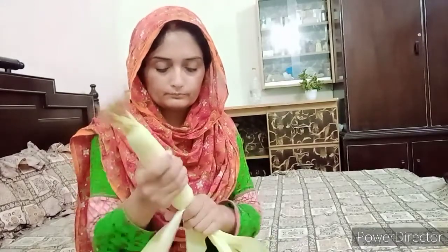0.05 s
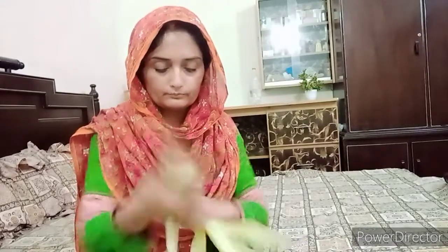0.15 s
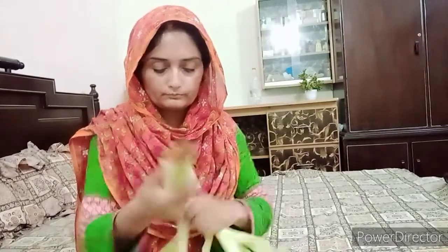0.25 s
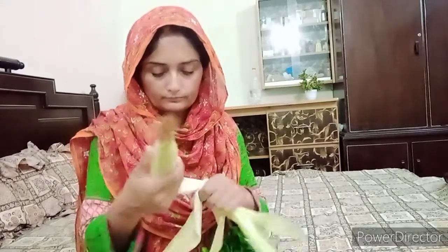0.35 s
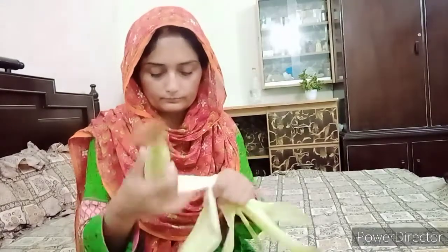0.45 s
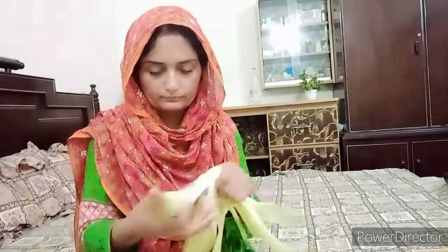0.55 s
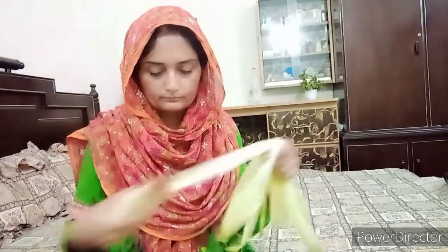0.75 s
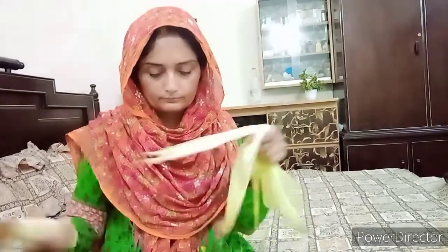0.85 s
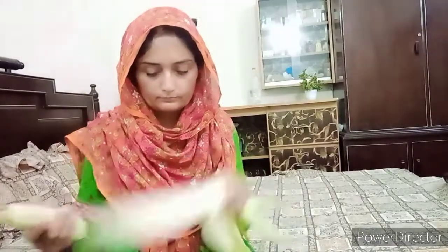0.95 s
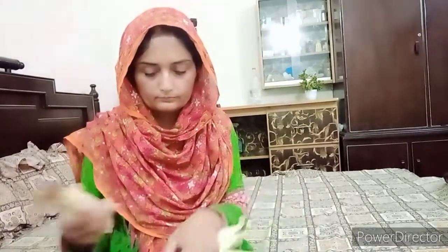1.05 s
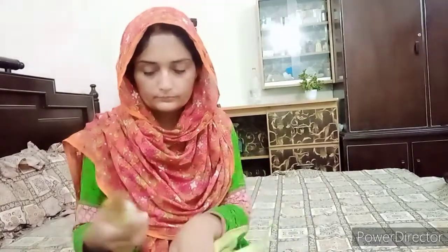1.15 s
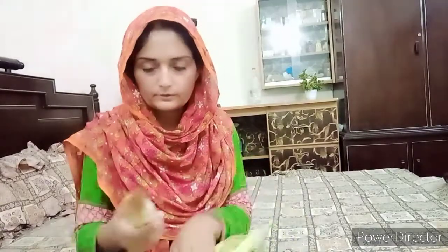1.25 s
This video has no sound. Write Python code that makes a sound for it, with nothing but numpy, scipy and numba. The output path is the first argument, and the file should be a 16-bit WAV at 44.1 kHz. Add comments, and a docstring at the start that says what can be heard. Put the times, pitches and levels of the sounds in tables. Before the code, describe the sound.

Dry corn husk crackles under fingers, snaps sharply off the cob, then tears in a short pull and a longer, louder one. Loose leaves brush softly afterwards, close to the microphone in a small, quiet room.

```python
"""Husking corn by hand

A small, quiet room, one microphone close to the hands. Fingers rustle and crease the dry husk.
A leaf snaps loose, knocking the cob, then tears along its fibres in a short and a long pull.
The loose husk brushes past and is gripped again. A low hum, perhaps a fan, wavers underneath."""
import sys
import numpy as np
from scipy import signal
from scipy.fft import rfft, irfft
from scipy.io import wavfile
from numba import njit

SR = 44100
rng = np.random.default_rng(int(sys.argv[2]) if len(sys.argv) > 2 else 0)


def unload_audio(sound):
    """Save the sound as a 16-bit wav file, at the path given as the first command line argument."""
    columns = np.transpose(np.atleast_2d(sound))
    # keep every value between -1 and 1, then stretch to whole-number steps
    steps = np.round(np.clip(columns, -1, 1) * 32767)
    wavfile.write(sys.argv[1], SR, steps.astype(np.int16))


N = 57330
TIME = np.arange(N) / SR


def undb(db):
    """Decibels to gain."""
    return 10 ** (np.asarray(db) / 20)


def unit(x):
    """Scale to rms 1."""
    return x / np.sqrt(np.mean(x ** 2))


def colour(x, points):
    """Causal filter of unit power, shaped through (frequency [Hz], relative gain [dB]) points."""
    hz, db = np.array(points, float).T
    size = 4096
    log_hz = np.log(np.fft.rfftfreq(size, 1 / SR) + 1)
    gain = unit(undb(np.interp(log_hz, np.log(hz), db)))
    cepstrum = irfft(np.log(gain))[:size // 2]
    cepstrum[1:] *= 2  # minimum phase
    response = irfft(np.exp(rfft(cepstrum, size)))[:size // 2]
    return signal.fftconvolve(x, response)[:N]


def grains(per_s, spread_db):
    """Random tiny clicks, many weak and a few strong, at rms 1."""
    size = undb(spread_db * np.minimum(rng.exponential(size=N), 5))
    return unit((rng.random(N) < per_s / SR) * size * rng.choice([-1, 1], N))


def strokes(rows, release_s):
    """Envelope of hand movements: a swell, a hold and a release."""
    power = np.zeros(N)
    for start, rise, length, db in rows:
        swell = np.clip((TIME - start) / rise, 0, 1)
        release = np.exp(-np.maximum(TIME - start - length, 0) / release_s)
        power += (undb(db) * swell * release) ** 2
    return np.sqrt(power)


@njit
def resonate(x, hz, width):
    """Band-pass with a moving centre, gain 1 at the centre."""
    y, band_state, low_state = np.empty(len(x)), 0., 0.
    for i in range(len(x)):
        tuning, damping = np.tan(np.pi * hz[i] / SR), width / hz[i]
        band = (band_state + tuning * (x[i] - low_state)) / (1 + tuning * (tuning + damping))
        band_state = 2 * band - band_state
        low_state += 2 * tuning * band
        y[i] = damping * band
    return y


def leaf_ring(clicks, modes, drift_share=.05, turns_per_s=25):
    """Clicks ring a leaf's resonances, which wander at random as if with the tension."""
    out = np.zeros(N)
    for hz, width, db in modes:
        steps = rng.uniform(-1, 1, 128)
        wander = np.interp(TIME * turns_per_s, np.arange(len(steps)), steps)
        centre = hz * (1 + drift_share * wander)
        first_pass = resonate(clicks, centre, 2. * width)
        out += undb(db) * unit(resonate(first_pass, centre, 2. * width))
    return out


def cracks(rows, points, walls, decay_s, room_db):
    """Each row is a burst of fracture noise that dies within milliseconds; the walls answer it."""
    bursts, impulses = np.zeros(2 * N), np.zeros(N)
    fade = np.exp(-TIME[:SR // 50] / decay_s)
    for start, db in rows:
        i = int(start * SR)
        bursts[i:i + len(fade)] += undb(db) * rng.choice([-1, 1], len(fade)) * fade
        impulses[i] += undb(db) * np.sqrt(np.sum(fade ** 2))
    echoes = undb(room_db) * signal.fftconvolve(impulses, walls)[:N]
    return colour(bursts[:N] + echoes, points)


# hum behind the hands (frequency [Hz], width [Hz], level [dB])
HUM_BANDS = [(189.6, 41, -67), (298.1, 33, -70), (344.4, 8.4, -74.5)]
# spectrum of the room's air (frequency [Hz], relative gain [dB])
AIR_SPECTRUM = [(25, -9.5), (80, -8.5), (150, 2.5), (260, 2), (450, -7), (1000, -11.5), (3000, -17),
                (8000, -13), (16000, -22.5)]


def room_tone(air_db=-66.5):
    """Narrow bands of noise waver as a hum over the faint air of the room."""
    freqs, hum = np.fft.rfftfreq(N, 1 / SR), np.zeros(N)
    for hz, width, db in HUM_BANDS:
        band = rfft(rng.standard_normal(N)) / (1 + (2 * (freqs - hz) / width) ** 2)
        hum += undb(db) * unit(irfft(band, N))
    return hum + undb(air_db) * colour(rng.standard_normal(N), AIR_SPECTRUM)


# loose husk sliding past (start [s], rise [s], length [s], level [dB])
BRUSH_STROKES = [(-.02, .01, 0.062, -44), (1.125, 0.035, .06, -47.5), (1.23, 0.021, 0.04, -48.5),
                 (1.27, 0.0093, .04, -44)]
# spectrum of the sliding (frequency [Hz], relative gain [dB])
BRUSH_SPECTRUM = [(200, -32), (500, -8.5), (1000, -10.5), (1700, -4), (3500, -0.5), (7000, 1), (11500, 0.5),
                  (14000, -5), (16000, -8)]


def brush():
    """Ribbed husk slides against hand and cob with a fine, full grain."""
    friction = grains(per_s=10000, spread_db=1.5)
    return colour(friction * strokes(BRUSH_STROKES, release_s=.033), BRUSH_SPECTRUM)


# fingers shifting on the leaves (start [s], rise [s], length [s], level [dB])
FINGER_STROKES = [(-.01, 0.022, 0.027, -45.5), (.032, .005, 0.062, -58.5), (.09, .01, 0.054, -57),
                  (.149, .003, 0.038, -47.5), (.188, 0.018, .054, -50), (.445, 0.025, 0.053, -60.5),
                  (.498, 0.013, 0.062, -49.5), (.56, 0.011, .04, -61.5), (.666, .012, 0.03, -67),
                  (1.008, 0.03, 0.062, -52), (1.054, 0.0051, 0.039, -45), (1.085, 0.012, 0.053, -51)]
# spectrum of the rustle, close up (frequency [Hz], relative gain [dB])
RUSTLE_SPECTRUM = [(100, -37), (300, -16.5), (1000, -20), (2250, -20), (3000, -5), (5300, -0.5), (7500, -1),
                   (11200, 2.5), (13500, -5.5), (16000, -1.5)]
# the hand gathering loose husk (start [s], rise [s], length [s], level [dB])
GATHER_STROKES = [(.972, 0.017, 0.061, -70.5), (1.04, 0.048, 0.097, -61)]
# resonances of the loose husk (frequency [Hz], nominal width [Hz], level [dB])
LOOSE_HUSK_MODES = [(1030, 290, -8.5), (2880, 150, -4), (3140, 140, -1), (4960, 600, -6)]


def rustle(release_s=.0052):
    """Fingers make the papery leaves crackle, with a ringing scrape where loose husk is gathered."""
    crackle = grains(per_s=3800, spread_db=2.5)
    papery = colour(crackle * strokes(FINGER_STROKES, release_s), RUSTLE_SPECTRUM)
    scrape = leaf_ring(crackle, LOOSE_HUSK_MODES) * strokes(GATHER_STROKES, release_s)
    return papery + scrape


# soft bumps from handling the ear (time [s], frequency [Hz], level [dB])
HANDLING_BUMPS = [(0., 185.4, -50), (0.074, 299.4, -49.5), (0.129, 191, -55), (0.507, 185, -56),
                  (0.631, 300.5, -51), (0.804, 182, -53), (1.019, 178, -55), (1.055, 182, -51.5)]


def bumps(rise_s=.0091):
    """Dull, low swells as the hands shift."""
    out = np.zeros(N)
    for start, hz, db in HANDLING_BUMPS:
        age = np.maximum(TIME - start, 0)
        swell = age / rise_s * np.exp(1 - age / rise_s)
        out += undb(db) * swell * np.sin(2 * np.pi * hz * age)
    return out


# single creases in the leaf (time [s], level [dB])
CREASE_TICKS = [(.0288, -46), (.1358, -27.5), (.1438, -28), (.1502, -39), (.2077, -34.5), (.2326, -54),
                (.3838, -34), (.528, -50), (.5508, -49), (.7695, -26.5), (1.024, -44), (1.040, -42),
                (1.1205, -46)]
# spectrum of a crease (frequency [Hz], relative gain [dB])
CREASE_SPECTRUM = [(300, -43), (1800, -19), (2800, -1.5), (5500, -0.5), (9500, -2), (12000, 1.5),
                   (16000, -9)]


def creases(walls):
    """The dry leaf creases in sharp ticks, a little louder at the microphone than their echoes."""
    return cracks(CREASE_TICKS, CREASE_SPECTRUM, walls, decay_s=.00078, room_db=-2.5)


# ribs of the leaf breaking (time [s], level [dB])
RIB_BREAKS = [(.2468, -29), (.2482, -13), (.2526, -29.5), (.2588, -23.5)]
# spectrum of a break (frequency [Hz], relative gain [dB])
SNAP_SPECTRUM = [(60, -58), (200, -11), (350, -31), (700, -15.5), (1250, -13.5), (1600, -7), (2250, -3),
                 (2750, -7.5), (3300, -4), (5000, -2), (7000, 0), (10000, 2), (12200, 1), (14000, -4),
                 (16000, -8)]


def snap(walls):
    """The ribs break at the base of the leaf in one quick cluster that fills the small room."""
    return cracks(RIB_BREAKS, SNAP_SPECTRUM, walls, decay_s=.0015, room_db=3.5)


# resonances of the cob (frequency [Hz], t60 [s], level before the bass cut [dB])
COB_RESONANCES = [(397, 0.085, -46), (467, 0.048, -39.5), (560, 0.035, -38), (725, 0.072, -44),
                  (1560, 0.12, -41.5), (2410, 0.05, -33.5)]


def cob_knock(cut_hz=353):
    """The strongest break rings the cob briefly, with no bass below the cut."""
    start, _ = max(RIB_BREAKS, key=lambda row: row[1])
    age = np.maximum(TIME - start, 0)
    ring = sum(undb(db - 60 * age / t60) * np.sin(2 * np.pi * hz * age) for hz, t60, db in COB_RESONANCES)
    return signal.sosfilt(signal.butter(4, cut_hz, "high", fs=SR, output="sos"), ring)


# strength of the short pull along the leaf (time [s], level [dB])
SHORT_PULL_CURVE = [(.27, -61), (.32, -50), (.365, -47.5), (.388, -43), (.41, -44), (.428, -55), (.46, -59)]
# strength of the long pull (time [s], level [dB])
LONG_PULL_CURVE = [(.68, -60.5), (.708, -43), (.735, -44), (0.761, -41), (0.774, -32.5), (.795, -37.5),
                   (0.839, -36), (0.866, -42), (0.901, -56.5)]
# spectrum of parting fibres, close up (frequency [Hz], relative gain [dB])
TEAR_SPECTRUM = [(100, -70), (500, -24.5), (1000, -34.5), (2400, -14), (4500, -2.5), (8000, -1), (11500, 0),
                 (14000, -4.5), (16000, -9.5)]
# moments when the leaf is taut (start [s], rise [s], length [s], level [dB])
TAUT_SPANS = [(.335, .02, 0.089, -63.5), (.692, 0.011, 0.081, -57), (.775, 0.014, 0.08, -58.5)]
# resonances of the taut leaf (frequency [Hz], nominal width [Hz], level [dB])
TAUT_LEAF_MODES = [(864, 110, -5.5), (1080, 155, -2.5), (1612, 144, -1.5), (2134, 226, -0.5),
                   (3340, 340, -2), (5620, 420, -3)]


def tear():
    """Fibres part one after another, louder with a harder pull; while the leaf is taut they ring it."""
    force = np.zeros(N)
    for pull in (SHORT_PULL_CURVE, LONG_PULL_CURVE):
        times, db = np.array(pull).T
        force += undb(np.interp(TIME, times, db, left=-120, right=-120))
    fibres = grains(per_s=4500, spread_db=2.5)
    rip = colour(fibres * force, TEAR_SPECTRUM)
    rasp = leaf_ring(fibres, TAUT_LEAF_MODES) * strokes(TAUT_SPANS, release_s=.0076)
    return rip + rasp


def room(low_t60_s=.22, treble_t60_s=.25, split_hz=11000, gap_s=.003):
    """Bare walls near the microphone return dense echoes whose treble lasts slightly longer."""
    echoes = grains(per_s=9000, spread_db=1.5) * (TIME > gap_s)
    low = signal.sosfilt(signal.butter(1, split_hz, fs=SR, output="sos"), echoes)
    tail = low * undb(-60 * TIME / low_t60_s) + (echoes - low) * undb(-60 * TIME / treble_t60_s)
    return tail / np.sqrt(np.sum(tail ** 2))


def scene(rub_room_db=-7.5):
    """At the microphone, in mono: the husk close by, its echo off the walls and the hum behind."""
    walls = room()
    rubs = rustle() + brush() + tear()
    rub_echoes = undb(rub_room_db) * signal.fftconvolve(rubs, walls)[:N]
    return (rubs + rub_echoes + snap(walls) + creases(walls) + cob_knock() + bumps() + room_tone())[None]


def record(dry):
    """The recorder cuts the top of the treble."""
    top_hz = 15500
    return signal.sosfilt(signal.ellip(10, .2, 70, top_hz, fs=SR, output="sos"), dry)


dry = scene()
out = record(dry)
unload_audio(out)
```